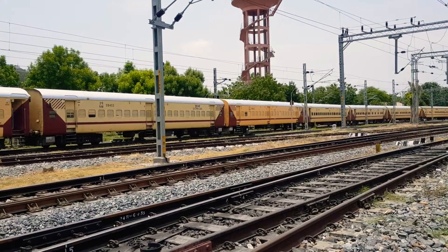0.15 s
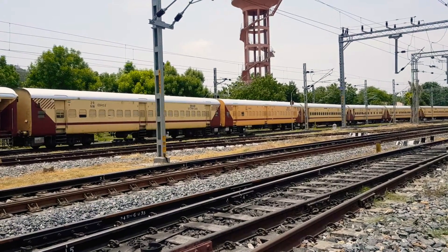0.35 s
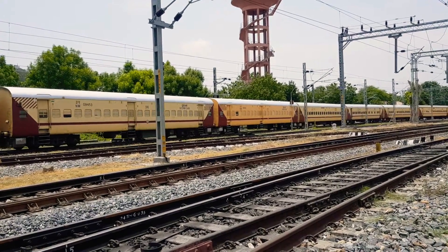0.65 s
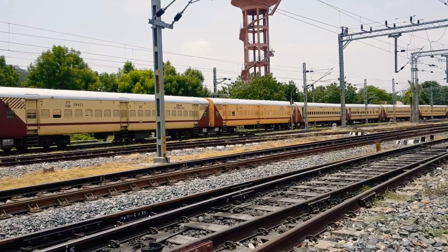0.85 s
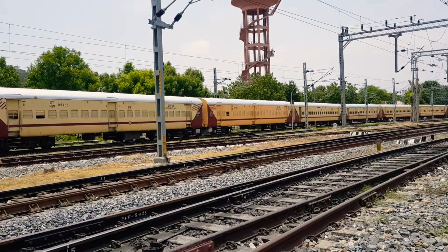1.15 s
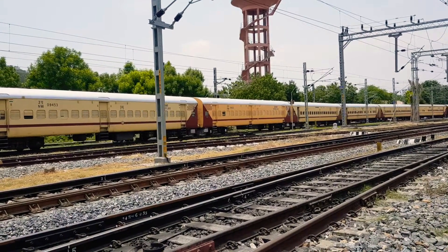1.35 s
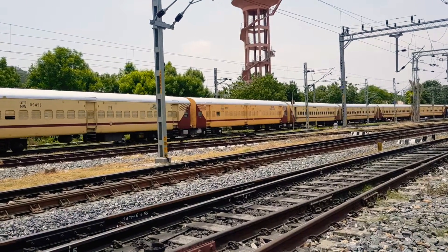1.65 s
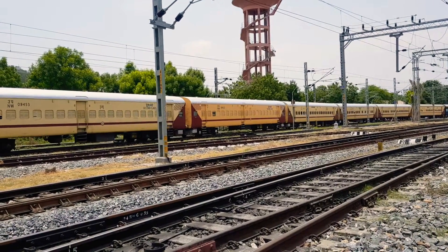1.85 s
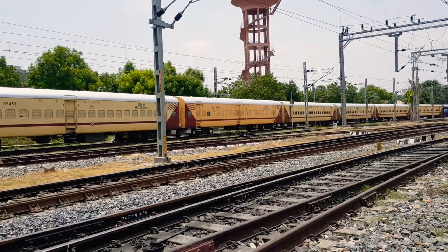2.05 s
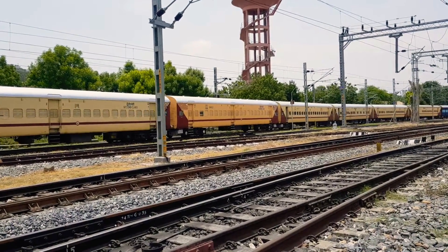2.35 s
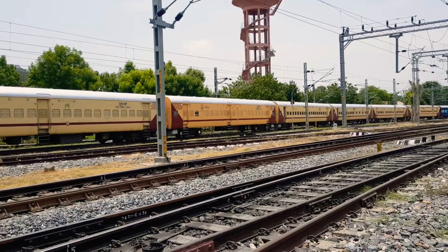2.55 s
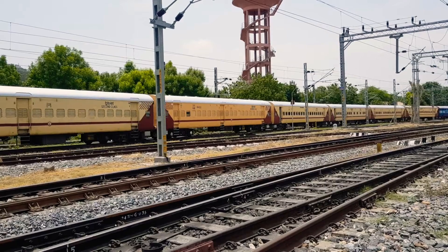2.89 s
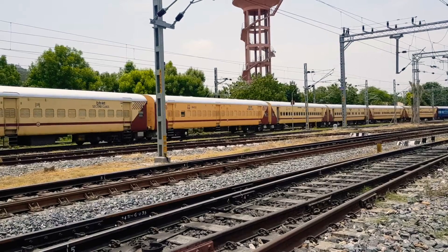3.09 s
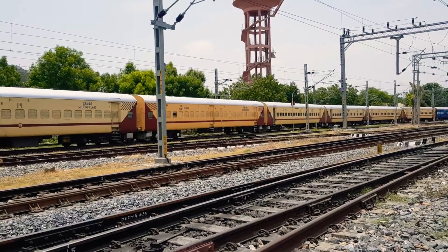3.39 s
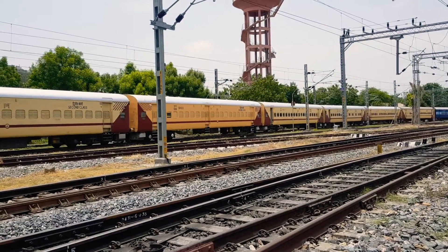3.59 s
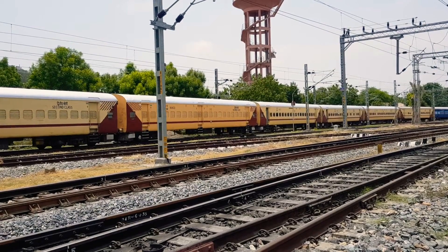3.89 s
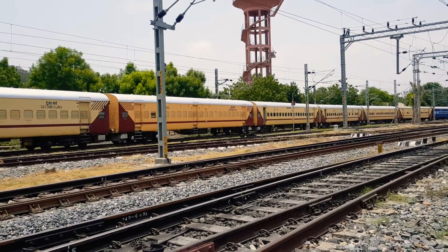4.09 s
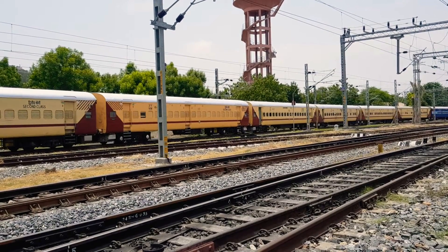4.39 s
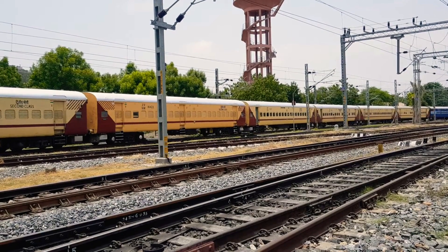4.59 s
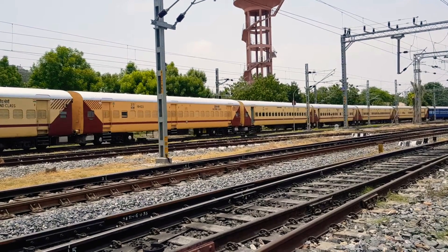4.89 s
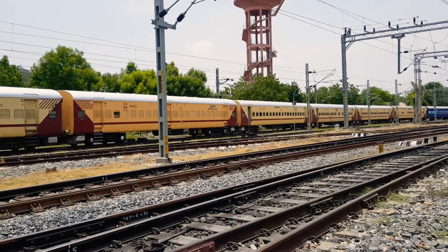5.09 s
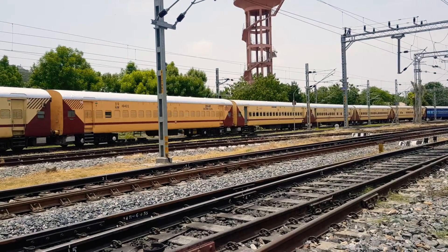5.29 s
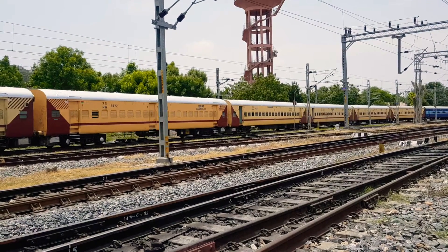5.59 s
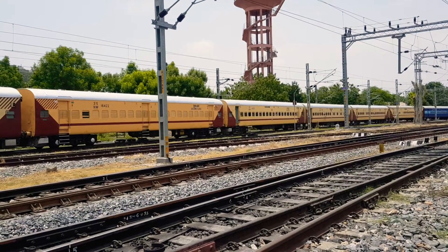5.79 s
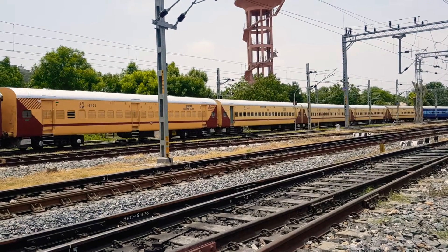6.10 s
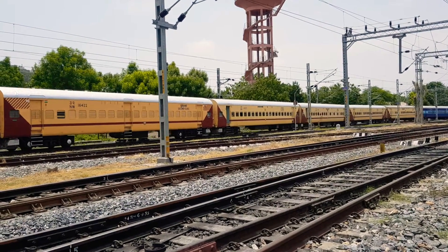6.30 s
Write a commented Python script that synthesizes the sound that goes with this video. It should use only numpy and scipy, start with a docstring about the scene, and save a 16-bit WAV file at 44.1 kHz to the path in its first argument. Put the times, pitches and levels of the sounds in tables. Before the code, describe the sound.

Wind buffets the microphone as a slow diesel train rumbles, whines and knocks along, ending with two loud air horn blasts.

```python
"""Slow train in a rail yard

A diesel locomotive off to the left pulls a long passenger train through an open yard. Its exhaust throbs
and its turbocharger, a fan spun by the exhaust, whines on two notes as it slows. Wheels roar and knock
on the rails, and wind buffets the microphones. At the end a two-note air horn blows twice and echoes."""
import sys
import numpy as np
from scipy import signal
from scipy.fft import rfft, irfft, next_fast_len
from scipy.io import wavfile

SR = 44100
rng = np.random.default_rng(int(sys.argv[2]) if len(sys.argv) > 2 else 0)


def unload_audio(sound):
    """Save the sound as a 16-bit wav file, at the path given as the first command line argument."""
    columns = np.transpose(np.atleast_2d(sound))
    # keep every value between -1 and 1, then stretch to whole-number steps
    steps = np.round(np.clip(columns, -1, 1) * 32767)
    wavfile.write(sys.argv[1], SR, steps.astype(np.int16))


N = 284443

# two opening wind pops on the microphones, then wheel knocks: t/s, level/dB, brightness/(dB per octave)
POPS_AND_KNOCKS = [(0.029, -28, -4), (0.063, -39, -6), (1.301, -45, -1), (1.381, -32, -8),
                   (2.018, -30, 0.5), (2.461, -36, 0), (2.928, -33, -7.5), (3.155, -31, -6),
                   (3.605, -50, 1), (3.831, -31, -5.5), (4.312, -34.5, 4), (4.667, -36, -1.5),
                   (4.922, -30, 3), (4.997, -25, -3.5), (5.3, -33, 0)]
# brief dips, and one lift, in the wind and the wheel roar: t/s, level change/dB
LEVEL_DIPS = [(1.95, -0.5), (2.15, 2), (3.791, -8), (4.0, -3.5), (4.42, -2.5), (4.728, -11), (4.89, -4),
              (5.12, -2), (5.43, -3.5)]
DIP_WIDTH_S = 0.06


def from_db(db):
    """Turn decibels into a number to multiply a sound by."""
    return 10 ** (np.asarray(db) / 20)


def rms_one(x):
    """Scale a sound so that its average strength (rms) is 1."""
    return x / np.sqrt(np.mean(x ** 2) + 1e-20)


def in_time(rows):
    """Join a table's timed points with lines: one curve for each column after the time."""
    times, *columns = np.transpose(rows)
    return [np.interp(np.arange(N) / SR, times, column) for column in columns]


def at_hz(points, hz):
    """Read between the rows of a frequency table, giving each octave equal room."""
    known_hz, values = np.transpose(points)
    return np.interp(np.log(np.maximum(hz, 1)), np.log(known_hz), values)


def cut(x, hz, keep="low", order=2):
    """Keep the part of a sound below hz ("low") or above it ("high")."""
    return signal.sosfilt(signal.butter(order, hz, keep, fs=SR, output="sos"), x)


def drift(rate_hz, size=N):
    """A random wobble of typical size 1; a higher rate makes it quicker."""
    noise = rng.standard_normal(size + SR // 2)
    return rms_one(cut(noise, rate_hz, order=3)[-size:])


def filtered(x, response):
    """Multiply each frequency in a sound by response(hz)."""
    size = next_fast_len(N + SR // 4)
    hz = np.arange(size // 2 + 1) * SR / size
    return irfft(rfft(x, size) * response(hz), size)[..., :N]


def coloured(colour, channels):
    """Noise of strength 1 with the given colour, its mix of low and high frequencies."""
    noise = rng.standard_normal((channels, N))
    return rms_one(filtered(noise, lambda hz: from_db(at_hz(colour, hz))))


def phase_of(hz):
    """How far a tone has turned through its cycles, in radians."""
    return 2 * np.pi * np.cumsum(hz) / SR


def bumps(times, heights, width_s):
    """A curve of bell-shaped bumps, each width_s wide at half its height."""
    t = np.arange(0, N, 40) / SR
    bells = .5 ** ((2 * (t[:, None] - times) / width_s) ** 2)
    return np.interp(np.arange(N) / SR, t, np.sum(heights * bells, axis=1))


def blade_tone(phase, level_db, smear, width_hz):
    """Swirling air smears a blade's pure tone (smear 0) into noise around the same pitch (smear 1)."""
    smear = np.clip(smear, 0, 1)
    band = (drift(width_hz) * np.sin(phase) + drift(width_hz) * np.cos(phase)) / np.sqrt(2)
    pure = np.sqrt(1 - smear ** 2) * np.sin(phase)
    return from_db(level_db) * np.sqrt(2) * (pure + smear * band)


def turbocharger():
    """Two bladed wheels on one shaft whine: the turbine almost cleanly, the compressor more roughly."""
    # turbine pitch as the shaft slows, is kicked up once and slows again: t/s, f/Hz
    turbine_pitch = [(0.0, 3412), (0.6, 3246), (1.2, 3103), (2.1, 2914), (2.88, 2778), (2.97, 2854),
                     (3.1, 2850), (3.2, 2894), (3.5, 2917), (3.75, 2928), (3.9, 2915), (4.1, 2869),
                     (4.4, 2813), (5.0, 2692), (5.3, 2644), (5.57, 2619)]
    # strength of each wheel's tone: t/s, level/dB
    turbine_levels = [(0.0, -51), (0.09, -45.5), (0.18, -38.5), (0.34, -55), (0.45, -48.5), (0.58, -51),
                      (0.8, -48.5), (1.08, -49), (1.18, -38.5), (1.33, -67), (1.45, -44.5), (1.85, -50.5),
                      (2.0, -42), (2.1, -46), (2.43, -34), (2.7, -46.5), (2.88, -47.5), (2.97, -39),
                      (3.06, -33), (3.24, -38.5), (3.35, -46.5), (3.7, -49.5), (3.87, -47), (3.96, -36),
                      (4.05, -46.5), (4.23, -36.5), (4.5, -53), (4.59, -44.5), (5.05, -53.5), (5.35, -56.5),
                      (5.49, -46), (5.6, -43.5), (5.7, -75)]
    compressor_levels = [(0.0, -46), (0.2, -56), (0.36, -37), (0.55, -44), (0.8, -53.5), (0.9, -63),
                         (1.05, -58.5), (1.9, -55), (2.43, -44.5), (2.7, -36), (2.88, -46.5), (2.97, -39),
                         (3.4, -52.5), (3.78, -50), (4.14, -63.5), (4.23, -50), (4.32, -62), (4.42, -44),
                         (4.52, -56), (4.75, -60), (5.22, -40), (5.4, -52), (5.49, -49.5), (5.7, -53)]
    # how noisy each tone is: t/s, turbine smear (0-1), compressor smear (0-1)
    smears = [(0, .45, .9), (1, .4, .9), (2, .25, .65), (2.5, .15, .35), (3.1, .25, .45), (4, .2, .6),
              (5.1, .2, .3), (5.6, .2, .4)]
    # raspy tones at 2 and 3 times the compressor pitch: t/s, 2nd level/dB, 3rd level/dB
    overtones = [(0.0, -64, -85), (0.3, -59.5, -66), (0.9, -54.5, -79), (1.8, -66.5, -76),
                 (2.1, -70.5, -71), (3.0, -64, -66), (3.7, -70.5, -67), (4.3, -76, -88), (5.1, -81, -74),
                 (5.7, -86, -74)]
    # weaker tones of the shaft: multiple of the turbine pitch, level/dB
    shaft_tones = [(.575, -58.5), (0.847, -69.5)]
    # these stand out after the kick: t/s, level change/dB
    shaft_boost = [(0, -3), (2.85, -8), (2.95, 7), (3.9, -7), (4.1, -8), (6.45, -7)]
    hz, = in_time(turbine_pitch)
    boost_db, = in_time(shaft_boost)
    turbine_smear, compressor_smear = in_time(smears)
    # both tones fade in and out
    turbine_db = in_time(turbine_levels)[0] + 2 * drift(6.5)
    compressor_db = in_time(compressor_levels)[0] + 2 * drift(6.5)
    turbine_phase = phase_of(hz * (1 + 0.0006 * drift(31)))
    compressor_phase = 14 / 9 * turbine_phase
    out = blade_tone(turbine_phase, turbine_db, turbine_smear, width_hz=26.5)
    out += blade_tone(compressor_phase, compressor_db, compressor_smear, width_hz=62)
    for k, level_db in enumerate(in_time(overtones), start=2):
        out += blade_tone(k * compressor_phase, level_db + 2.5 * drift(12), smear=.92, width_hz=60 * k)
    for multiple, level_db in shaft_tones:
        shaft_db = level_db + boost_db + 3.8 * drift(1.3)
        out += blade_tone(multiple * turbine_phase, shaft_db, smear=0.99, width_hz=8.2)
    return out


def roar_and_rush():
    """Wheels roar and the rail sings; under the horn the low rumble dips and the horn's rush takes over."""
    # wheel roar, then from 5.7 s the horn's rushing noise: t/s, low level/dB, high level/dB
    noise_levels = [(0.0, -42, -37), (0.2, -42, -32.5), (1.3, -45, -34), (2.9, -43.5, -32),
                    (3.5, -41.5, -34), (4.2, -47.5, -35), (5.55, -44.5, -36), (5.7, -50, -26),
                    (6.45, -79, -49)]
    # colour of this noise: f/Hz, level/dB
    noise_colour = [(60, 6), (250, 2.5), (500, 0.5), (900, -8.5), (1500, -13.5), (2300, -18), (3500, -23),
                    (4400, -19.5), (5300, -31), (7000, -45.5), (15500, -46)]
    noise = surround(noise_colour)
    noise += from_db(-12.5) * rms_one(rail_ring(rail_ring(noise)))
    low, high = cut(noise, 1100), cut(noise, 1100, "high")
    flicker_db = 1.3 * drift(11.1)
    swell_times = np.transpose(POPS_AND_KNOCKS)[0] + 0.029  # just after each pop or knock
    swell = bumps(swell_times, heights=1, width_s=0.041)
    dips_db = bumps(*np.transpose(LEVEL_DIPS), DIP_WIDTH_S)
    low_db, high_db = in_time(noise_levels)
    low_db = low_db + 3.5 * swell + dips_db + flicker_db
    high_db = high_db + 0.5 * swell + 0.29 * dips_db + flicker_db
    return from_db(low_db) * low - from_db(high_db) * high


def rail_ring(x, hz=678, width_hz=230):
    """The rail picks out a broad band of frequencies around its own pitch."""
    decay = np.exp(-np.pi * width_hz / SR)
    gain = (1 - decay ** 2) / 2
    feedback = [1, -2 * decay * np.cos(2 * np.pi * hz / SR), decay ** 2]
    return signal.lfilter([gain, 0, -gain], feedback, x)


def intake():
    """Air drawn into the engine makes a smooth, bright hiss."""
    # strength of the hiss: t/s, level/dB
    hiss_levels = [(0.0, -65.5), (0.43, -63), (0.91, -67), (1.9, -66), (3.8, -66), (4.11, -70),
                   (5.55, -67.5), (5.7, -63)]
    # colour of the hiss: f/Hz, level/dB
    hiss_colour = [(3000, -26), (5500, -14), (7000, 7), (7900, 1.5), (9000, 7.5), (12500, 8), (14500, -24),
                   (15600, -40)]
    level_db, = in_time(hiss_levels)
    return from_db(level_db) * surround(hiss_colour)


def wind():
    """Wind buffets the microphones with a low, lumpy rumble, partly different on each side."""
    # the rumble between gusts: t/s, level/dB
    wind_levels = [(0.0, -18.5), (0.2, -28.5), (0.97, -30), (1.15, -32.5), (1.5, -28.5), (2.05, -32.5),
                   (2.41, -31.5), (2.8, -31.5), (3.6, -32.5), (4.06, -37.5), (4.54, -32.5), (5.1, -39),
                   (5.5, -36), (5.8, -47), (6.45, -52)]
    # colour of the rumble: f/Hz, level/dB
    wind_colour = [(20, -29), (32, -0.5), (45, -0.5), (90, 3), (150, -7), (260, -11.5), (420, -26),
                   (900, -64), (3000, -96)]
    # short gusts and one lull: t/s, level change/dB
    gusts = [(1.31, 2.5), (1.98, 2.5), (2.89, 9), (3.16, 11), (3.34, 7), (3.57, 3), (3.74, 5), (3.85, 11),
             (4.81, -3), (5.56, 8)]
    level_db, = in_time(wind_levels)
    level_db += bumps(*np.transpose(gusts), width_s=0.027)
    level_db += bumps(*np.transpose(LEVEL_DIPS), DIP_WIDTH_S)
    shared, left, right = coloured(wind_colour, channels=3)
    rumble = 0.63 * shared + np.array([left, right])
    lumps_db = 3 * np.array([drift(14.2), drift(11.1)]) + 3.54 * drift(35.7)
    return from_db(level_db) * rms_one(from_db(lumps_db) * rumble)


def pops_and_knocks():
    """Two wind pops, then wheels knocking over rail joints; all are made with one rattle and ring."""
    # a wheel's own notes: f/Hz, level/dB, time to fade by 60 dB/s
    wheel_notes = [(271, -3, 0.31), (419, -6, 0.16), (610, -23, 0.037), (1012, 2.5, 0.06),
                   (1184, -3.5, 0.078), (1710, -13, .03), (2460, -5, 0.021), (4360, -11, .02)]
    times, hit_db, bright_db = np.transpose(POPS_AND_KNOCKS)
    starts = np.round(times * SR).astype(int)
    t = np.arange(SR // 10) / SR
    rattle = rng.standard_normal(len(t)) * from_db(-60 * t / 0.037 - 20.5)
    rattle[0] = 1  # the first sharp hit
    scatters_db = rng.normal(0, 3.4, (len(starts), len(wheel_notes))).T
    ringing = np.zeros(N)
    for (hz, note_db, fade_s), scatter_db in zip(wheel_notes, scatters_db):
        clicks = np.full(N, 1e-18)
        clicks[starts] = from_db(hit_db + note_db - 9 + scatter_db + bright_db * np.log2(hz / 600))
        decay, step = from_db(-60 / (fade_s * SR)), 2 * np.pi * hz / SR
        # each click starts a fading tone
        ringing += signal.lfilter([0, np.sin(step)], [1, -2 * decay * np.cos(step), decay ** 2], clicks)
    return signal.fftconvolve(ringing, rattle)[:N]


def exhaust():
    """Uneven engine firings make the exhaust pipe's low note throb, with a weak tone an octave up."""
    # one row a throb: middle t/s, peak level/dB, f/Hz, width at half height/s
    throbs = [(0.097, -16.5, 98, 0.014), (0.157, -15, 91, 0.012), (0.219, -20, 92.6, .029),
              (0.256, -20, 91, 0.028), (0.332, -14.5, 85.4, 0.038), (0.371, -14.5, 79, 0.0091),
              (0.518, -21, 83, 0.056), (0.612, -20.5, 81.3, 0.062), (0.721, -18.5, 83.6, 0.046),
              (0.803, -17, 85, .035), (0.921, -18, 81, 0.077), (0.996, -18, 86, 0.02),
              (1.057, -23, 79, 0.015), (1.108, -17.5, 79.5, 0.045), (1.225, -17, 79.5, .044),
              (1.319, -17.5, 80, .045), (1.416, -17.5, 82, .019), (1.455, -20, 82, 0.017),
              (1.527, -12.5, 80.6, 0.042), (1.585, -19.5, 85, .01), (1.686, -15.5, 82.5, 0.018),
              (1.739, -18.5, 74, 0.021), (1.85, -23, 82, 0.046), (1.96, -17, 80, 0.033),
              (2.074, -22, 79.5, 0.032), (2.17, -22, 81.5, 0.044), (2.225, -18, 81, 0.032),
              (2.267, -19, 80, 0.012), (2.305, -26, 81, 0.027), (2.361, -17.5, 78.4, .027),
              (2.419, -18, 73.5, .03), (2.527, -23.5, 80, 0.017), (2.578, -18.5, 87, 0.019),
              (2.638, -17.5, 79, 0.03), (2.754, -22.5, 94, 0.014), (2.869, -15.5, 82.6, 0.077),
              (2.931, -20, 84, 0.049), (2.989, -18, 81, 0.03), (3.069, -17.5, 84, 0.041),
              (3.169, -19, 80, 0.051), (3.317, -22.5, 81.3, 0.12), (3.357, -18.5, 81.4, 0.032),
              (3.476, -24.5, 87.5, 0.069), (3.571, -22.5, 84, 0.028), (3.7, -25.5, 82, 0.053),
              (3.741, -20.5, 89.6, 0.018), (3.858, -23, 79, 0.031), (3.96, -27, 78.6, 0.026),
              (4.026, -25.5, 79.6, 0.01), (4.09, -36, 83, .03), (4.209, -25.5, 80, 0.055),
              (4.323, -27, 87, 0.021), (4.398, -26.5, 77, 0.016), (4.506, -31, 91, 0.043),
              (4.564, -30, 84.4, 0.016), (4.608, -37, 88, 0.029), (4.812, -24, 70, 0.018),
              (4.956, -30.5, 92, .028), (5.01, -28.5, 73, 0.05), (5.168, -37, 78, 0.023),
              (5.236, -36, 105, 0.035), (5.298, -35, 96, 0.034), (5.595, -25, 73.4, 0.013)]
    out, t = np.zeros(N), np.arange(N) / SR
    start_phases = rng.uniform(0, 2 * np.pi, len(throbs))
    for (middle_s, peak_db, hz, width_s), start_phase in zip(throbs, start_phases):
        near = slice(max(int((middle_s - 2 * width_s) * SR), 0), int((middle_s + 2 * width_s) * SR))
        offset_s = t[near] - middle_s
        swell = .5 ** ((2 * offset_s / width_s) ** 2)
        phase = 2 * np.pi * hz * offset_s + start_phase
        out[near] += from_db(peak_db) * swell * (np.sin(phase) + from_db(-24.5) * np.sin(2 * phase))
    return out


def horn_blasts():
    """Each blast starts a little high and settles as the air pressure falls; gives pitch and rasp."""
    # the high horn's blasts: start t/s, settled f/Hz, extra f/Hz, settling time/s, amount of rasp
    blasts = [(5.595, 471, 19, .045, .25), (5.97, 466, 11, .15, .5)]
    t = np.arange(N) / SR
    latest = np.maximum(np.searchsorted(np.transpose(blasts)[0], t) - 1, 0)
    start_s, settled_hz, extra_hz, settling_s, rasp = np.array(blasts)[latest].T
    age_s = np.maximum(t - start_s, 0)
    return settled_hz + extra_hz * np.exp(-age_s / settling_s), rasp


def trumpet(phase, level_db, bright_db, harmonics, start_s=5.58):
    """A flapping metal disc chops air into pulses; more pressure lifts the higher tones."""
    out = np.zeros(N)
    on = slice(int(start_s * SR), N)
    for k, harmonic_db in harmonics:
        lift_db = bright_db[on] * np.log(k) / np.log(6)
        # warm moving air makes the tones waver, the high ones most
        waver_db = 1.06 * np.log(k) * drift(11.3, size=N - on.start)
        out[on] += from_db(level_db[on] + harmonic_db + lift_db + waver_db) * np.cos(k * phase[on] + .38)
    return out


def horns():
    """Two trumpets share one air valve, so loud that the low one bends the high one's wave to a rasp."""
    # each horn through both blasts: t/s, level/dB, brightness (lift at 6 times the pitch)/dB
    high_levels = [(5.59, -53, -32.5), (5.605, -10.5, -16), (5.63, -10.5, -10), (5.7, -19, 2),
                   (5.77, -14, -5.5), (5.8, -13, -15), (5.85, -20, -32), (5.9, -26, -49.5),
                   (5.96, -25, -21), (6.02, -15.5, -8.5), (6.1, -20, 0.5), (6.15, -16.5, -3.5),
                   (6.25, -14, -6.5), (6.3, -18, -5.5), (6.38, -18, -4), (6.45, -25.5, 2)]
    low_levels = [(5.585, -82, -10), (5.6, -44, -4), (5.63, -36.5, -2), (5.82, -35, -7), (5.96, -44.5, -16),
                  (6.01, -39, 4), (6.45, -37.5, 2.5)]
    # the tones that make up each horn: multiple of its pitch, level/dB
    high_harmonics = [(1, 1), (2, 2.5), (3, -6), (4, 0.5), (5, 0), (6, -6.5), (7, -9), (8, -7.5), (9, -8),
                      (10, -15), (11, -8.5), (12, -16), (13, -20.5), (14, -15), (15, -17), (16, -24),
                      (17, -23.5), (18, -19.5), (19, -18.5), (20, -15.5), (21, -17), (22, -27), (23, -13.5),
                      (24, -11.5), (25, -13), (26, -38), (27, -18), (28, -13), (29, -18), (30, -32),
                      (31, -18), (32, -32), (33, -25)]
    low_harmonics = [(1, 8), (2, -1), (3, 9.5), (4, 5), (5, 4.5), (6, -3), (7, -2), (8, 1), (9, -2),
                     (10, -0.5), (11, -7), (12, 2.5), (13, -13), (14, -9), (15, -8), (16, -10), (17, 0),
                     (18, -28), (19, -20), (20, -16)]
    high_hz, rasp = horn_blasts()
    high_db, high_bright_db = in_time(high_levels)
    low_db, low_bright_db = in_time(low_levels)
    low_hz = .5855 * high_hz + .14 * np.maximum(-5 - high_bright_db, 0)  # rises as the high horn dulls
    high_phase = phase_of(high_hz * (1 + 0.0015 * drift(55)))
    low_phase = phase_of(low_hz * (1 + 0.00044 * drift(44)))
    low = trumpet(low_phase, low_db, low_bright_db, low_harmonics)
    swing = cut(low, 700)  # the slow pressure swing does the bending
    high = trumpet(high_phase + rasp * swing, high_db, high_bright_db, high_harmonics)
    ragged = rasp * 0.094 * drift(660)  # the strained disc flaps unevenly
    both = high * (1 + 0.41 * swing + ragged) + low
    return ground_bounce(cut(both, 230, "high"))  # the horn mouths give out little bass


def ground_bounce(x, delay_s=0.000735, echo_db=-14, dull_hz=8300):
    """The stones under the track add a quick, duller echo with its wave turned upside down."""
    echo = lambda hz: from_db(echo_db) * np.exp(-2j * np.pi * hz * delay_s) / (1 + 1j * hz / dull_hz)
    return filtered(x, lambda hz: 1 - echo(hz))


def from_left(x):
    """Sound reaches the left microphone first; the body that holds the pair colours each side."""
    # how early the left side hears it: f/Hz, lead/ms
    left_lead = [(80, .15), (300, 0.2), (600, 0.44), (1500, 0.48), (16000, 0.462)]
    # how much louder the left is than the right: f/Hz, level/dB
    balance = [(60, -2), (110, 1.5), (200, -1), (380, -2.5), (700, -1), (1290, -3), (2380, -4.5),
               (4400, 4.5), (8120, -4.5), (15000, 1.5)]
    side = np.array([[.5], [-.5]])
    gain = lambda hz: from_db(side * at_hz(balance, hz))
    time_shift = lambda hz: np.exp(2j * np.pi * hz * side * at_hz(left_lead, hz) / 1000)
    return filtered(x, lambda hz: gain(hz) * time_shift(hz))


def surround(colour):
    """Noise that comes partly from the train and partly from all around."""
    # the train's part, heard on both sides: f/Hz, share of the power (0-1)
    train_share = [(60, 0.25), (250, 0.66), (600, 0.67), (2000, 1), (5000, 0.21), (10000, 0.45)]
    shared, *own = coloured(colour, channels=3)
    share = lambda hz: np.clip(at_hz(train_share, hz), 0, 1)
    direct = filtered(shared, lambda hz: np.sqrt(share(hz)))
    all_around = filtered(own, lambda hz: np.sqrt(1 - share(hz)))
    return from_left(direct) + all_around


def yard_echo(x, fade_s=0.73, level_db=-17.5):
    """Dull echoes off carriages and sheds blur into a fading tail on each side."""
    t = np.arange(SR) / SR
    tail = rng.standard_normal((2, SR)) * from_db(-60 * t / fade_s) * (t > .02)
    tail = cut(tail, 3600, order=1)
    tail /= np.sqrt(np.sum(tail ** 2, axis=1, keepdims=True))
    return from_db(level_db) * signal.fftconvolve(x[None], tail, axes=1)[:, :N]


def scene():
    """The train is heard from the left; the wind's rumble is right at the microphones."""
    echoing = turbocharger() + pops_and_knocks() + horns()
    return from_left(echoing + exhaust()) + yard_echo(echoing) + roar_and_rush() + intake() + wind()


def record(dry):
    """Round off the loudest peaks and cut the very highest treble."""
    rounded = 1.6 * np.tanh(dry / 1.6)
    return signal.sosfilt(signal.ellip(10, .5, 80, 15500, fs=SR, output="sos"), rounded)


dry = scene()
out = record(dry)
unload_audio(out)
```